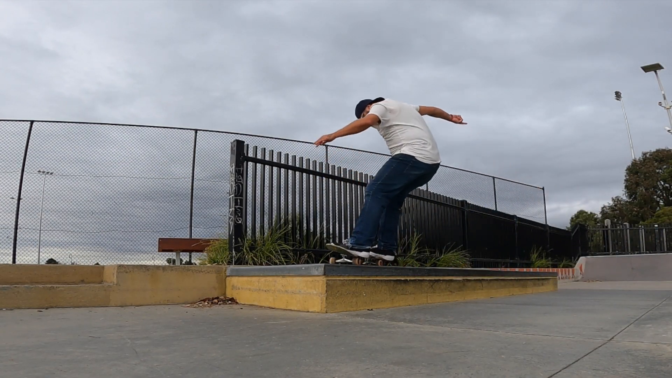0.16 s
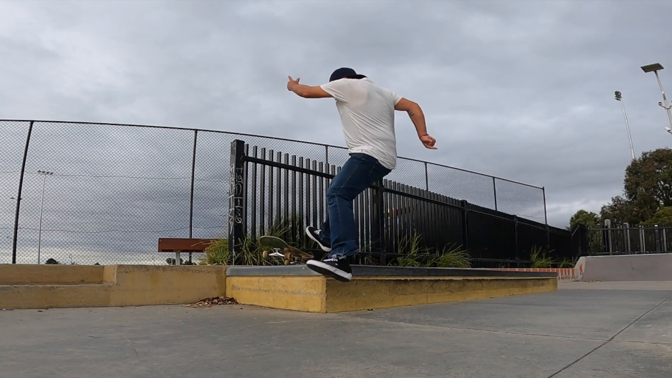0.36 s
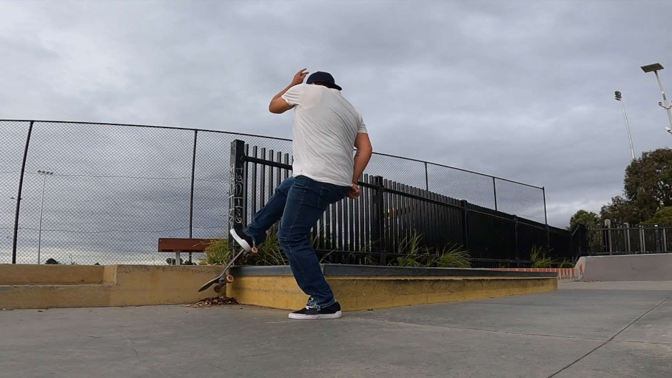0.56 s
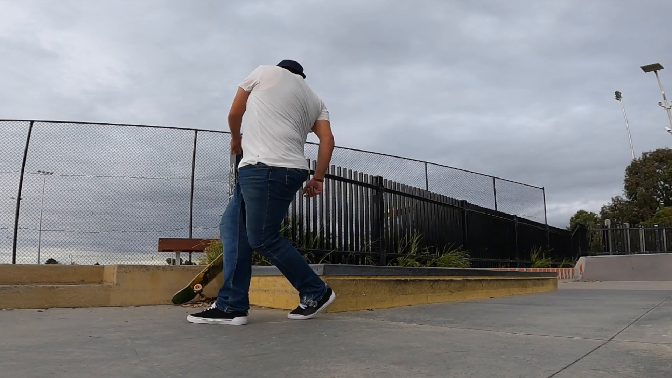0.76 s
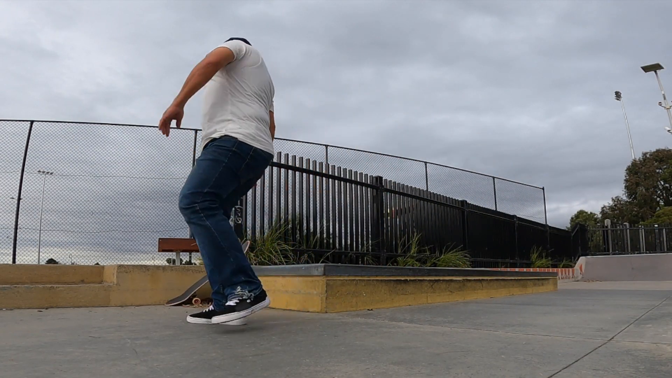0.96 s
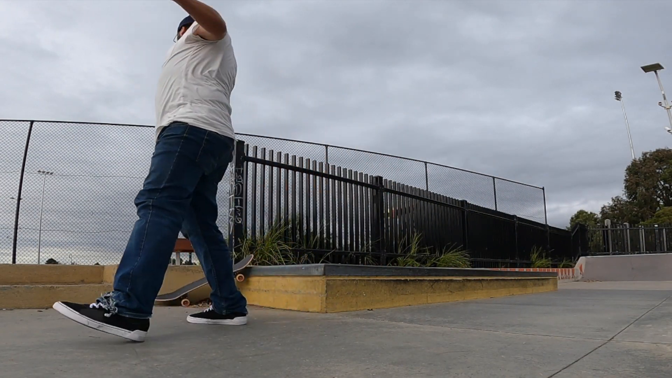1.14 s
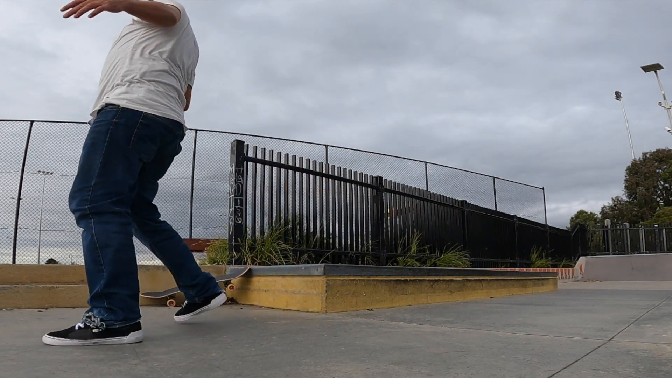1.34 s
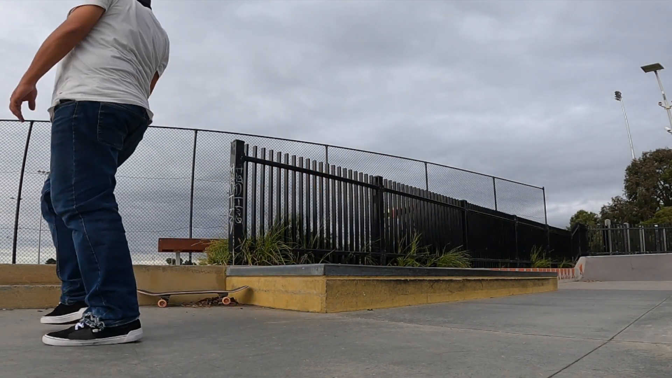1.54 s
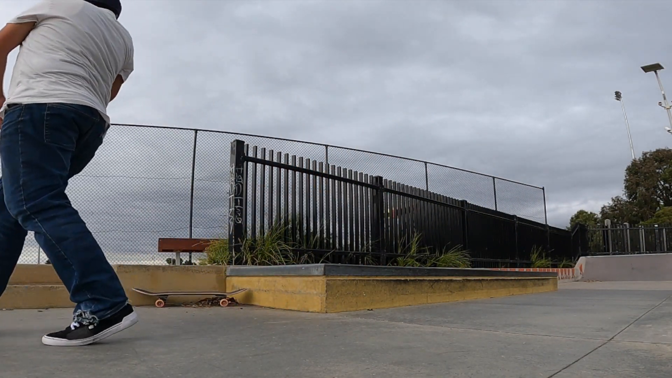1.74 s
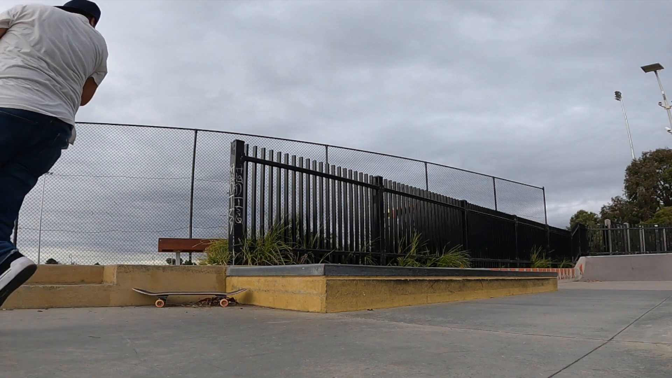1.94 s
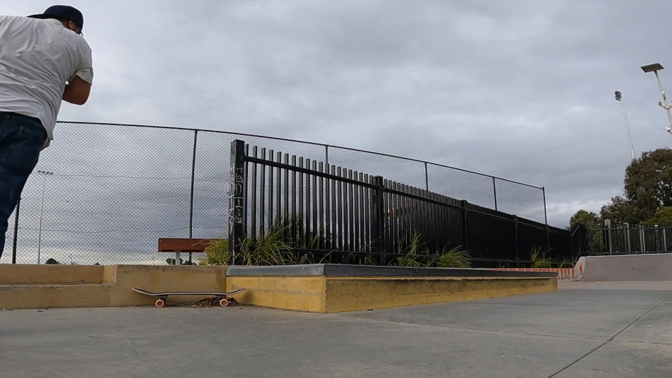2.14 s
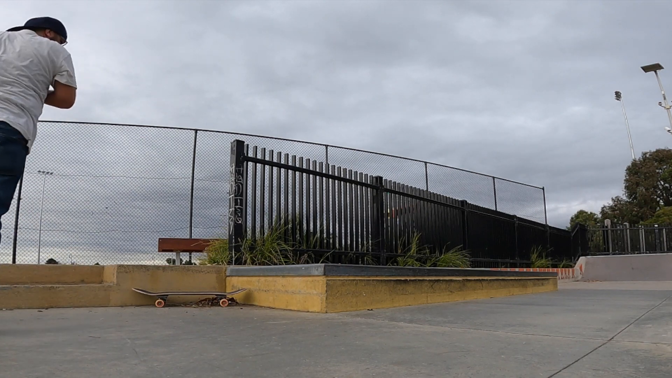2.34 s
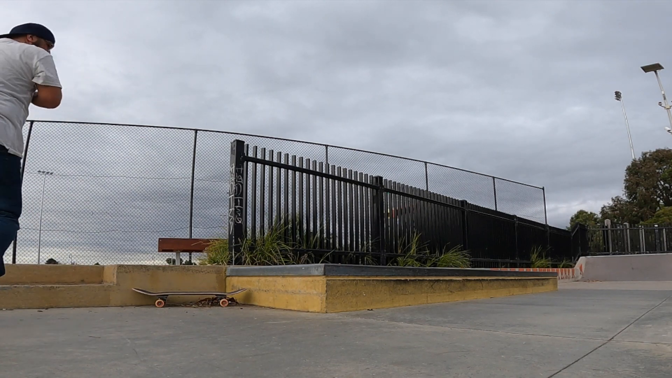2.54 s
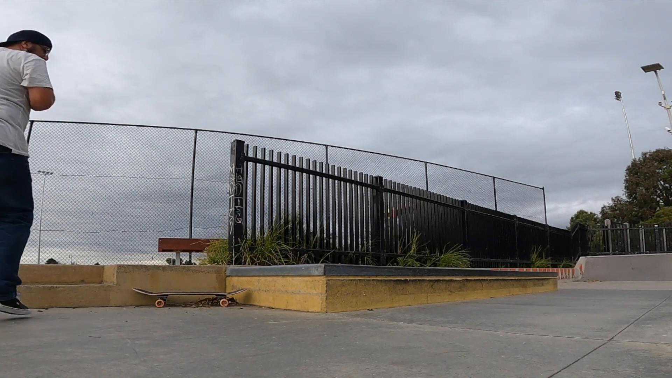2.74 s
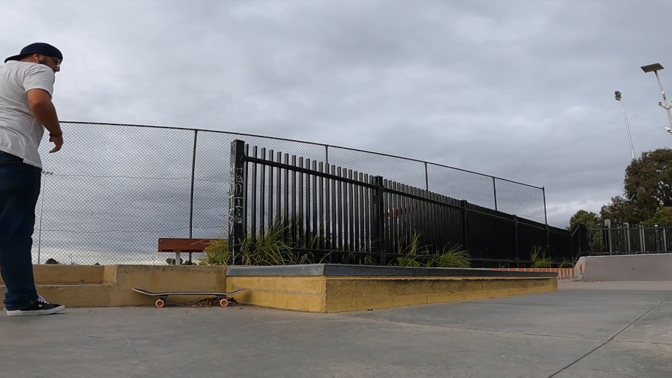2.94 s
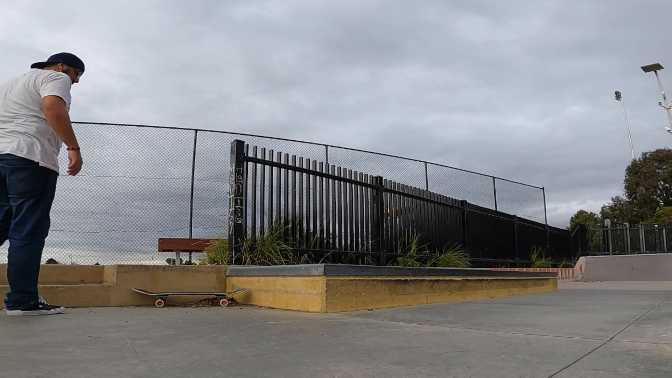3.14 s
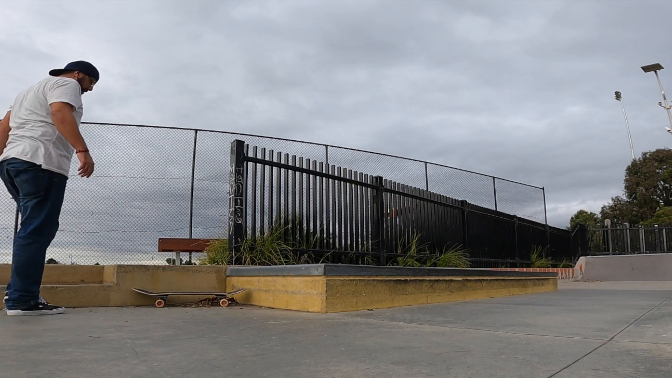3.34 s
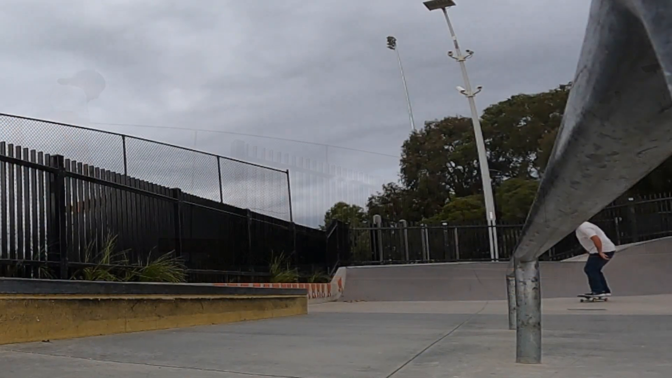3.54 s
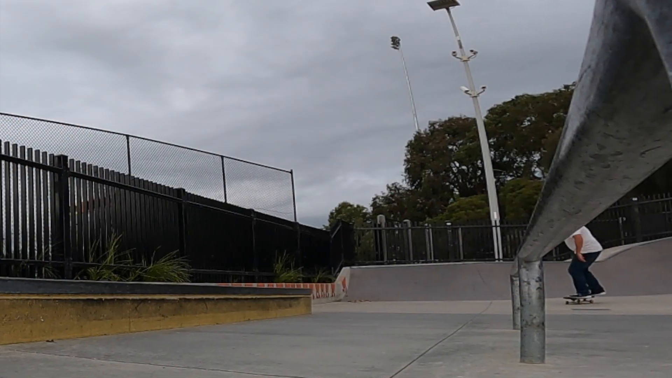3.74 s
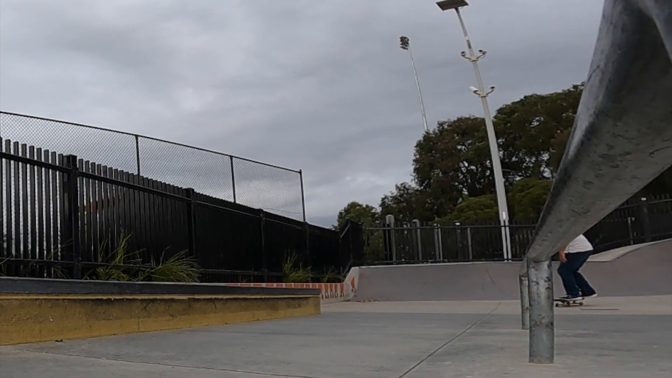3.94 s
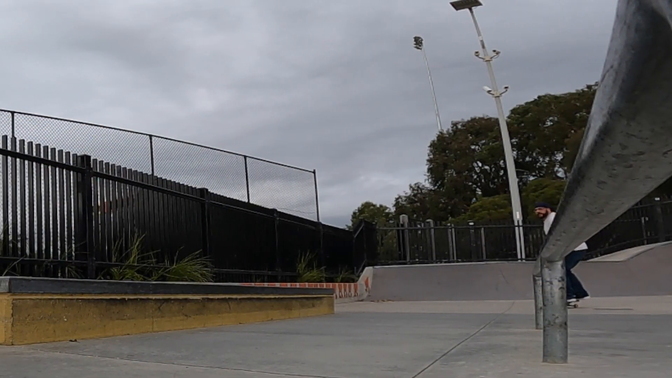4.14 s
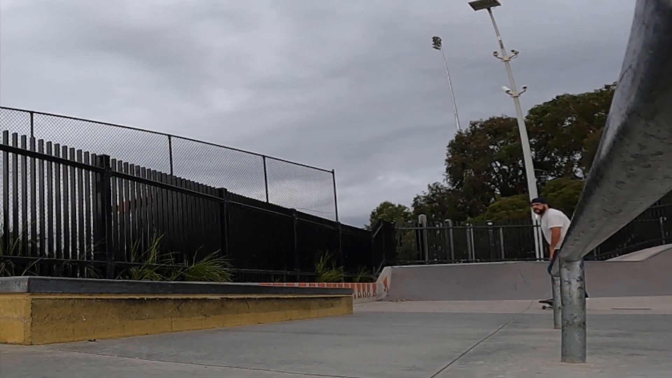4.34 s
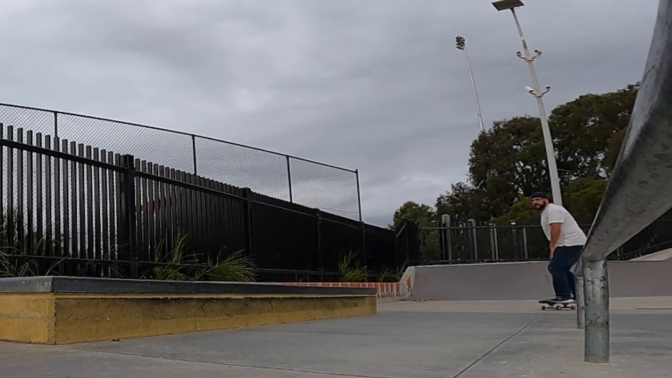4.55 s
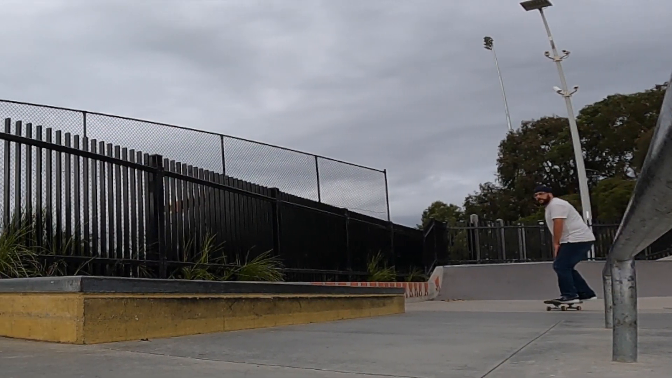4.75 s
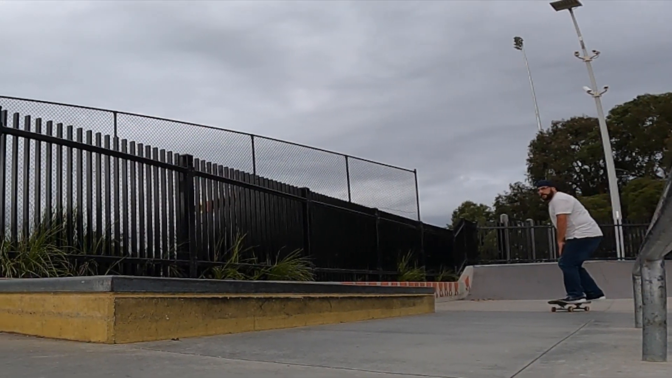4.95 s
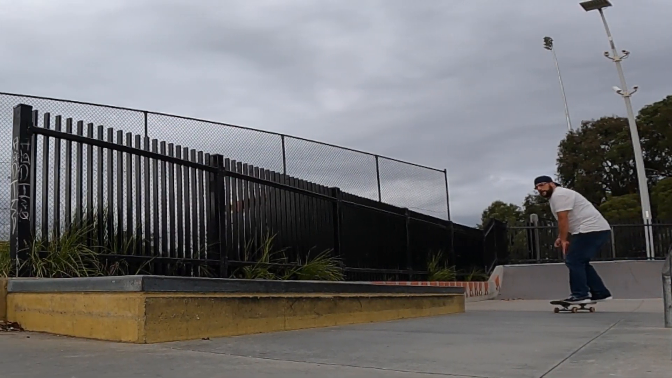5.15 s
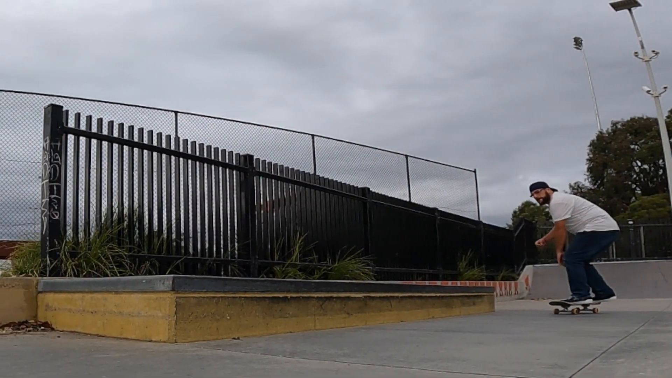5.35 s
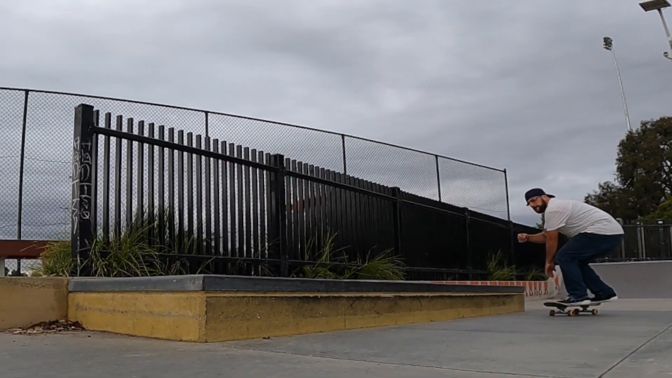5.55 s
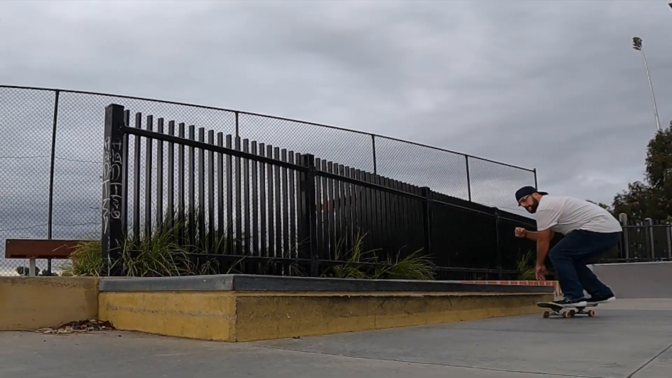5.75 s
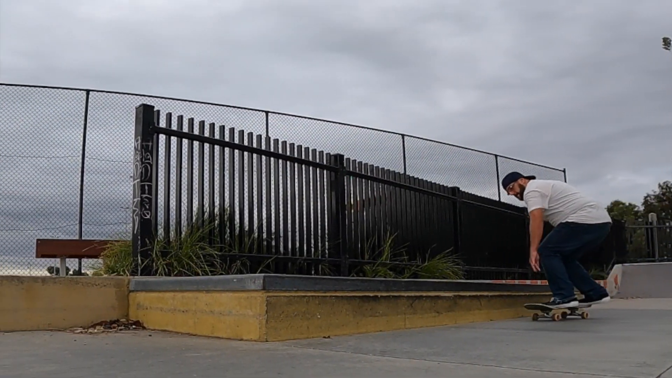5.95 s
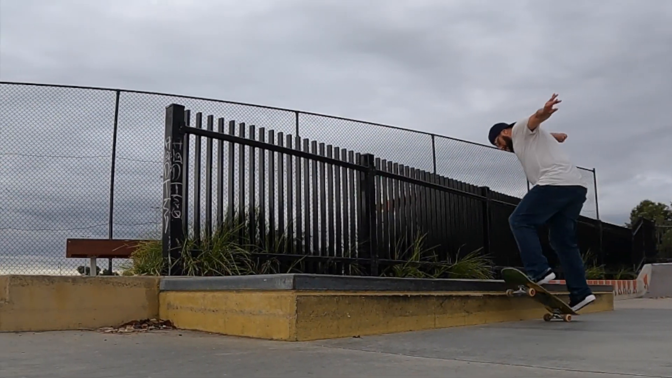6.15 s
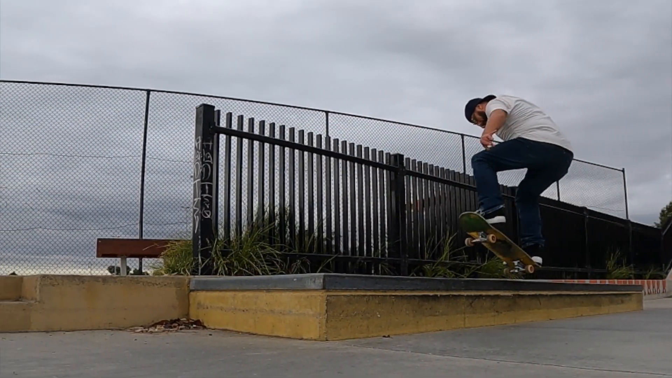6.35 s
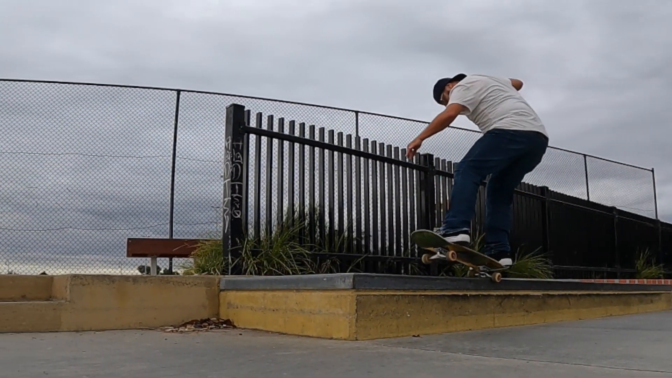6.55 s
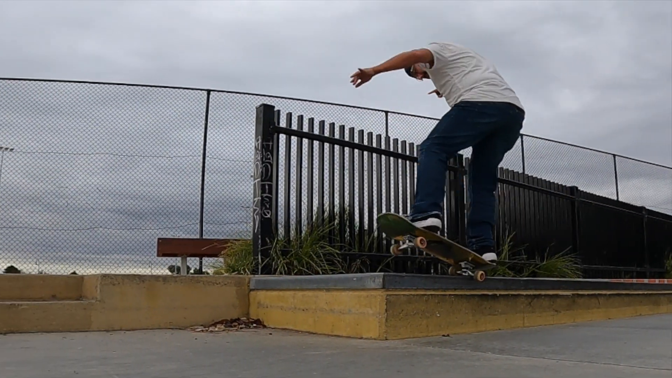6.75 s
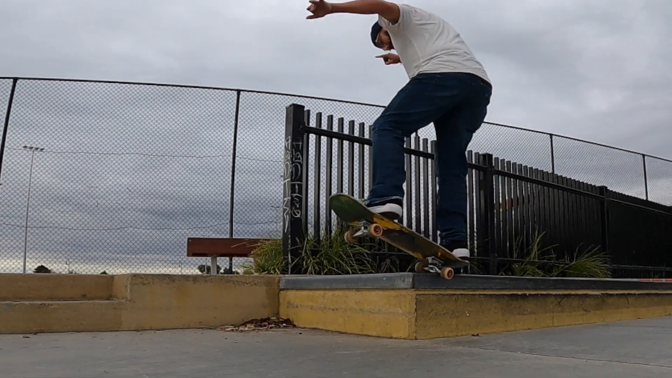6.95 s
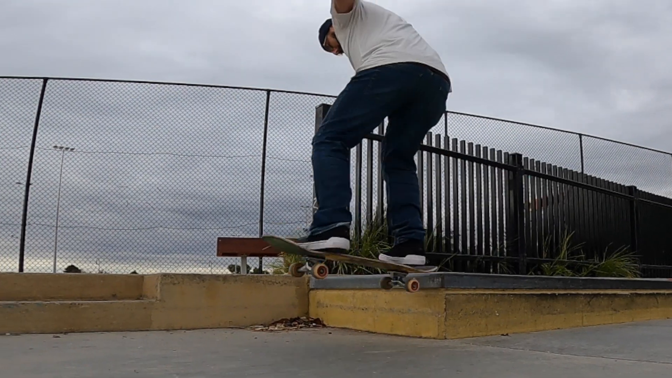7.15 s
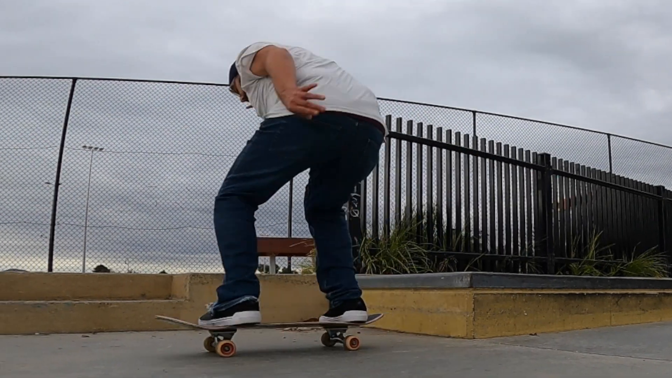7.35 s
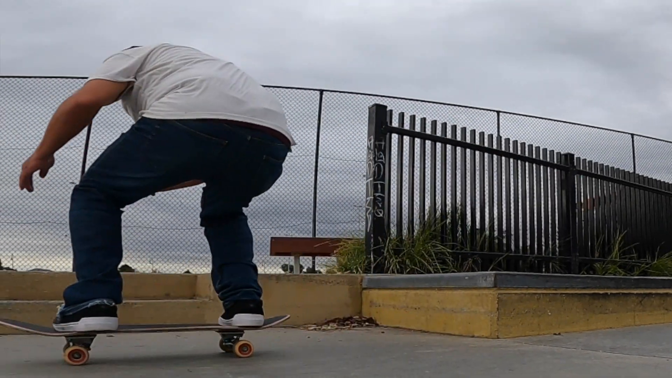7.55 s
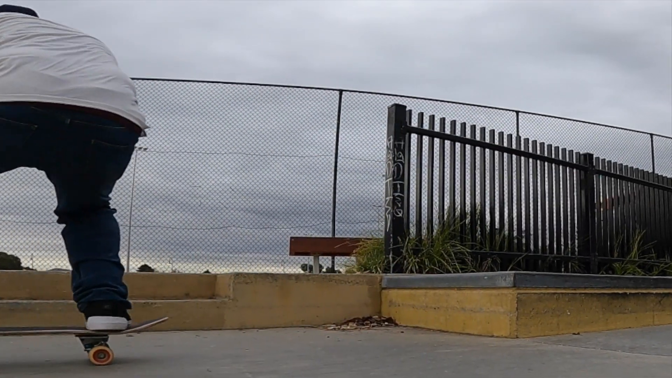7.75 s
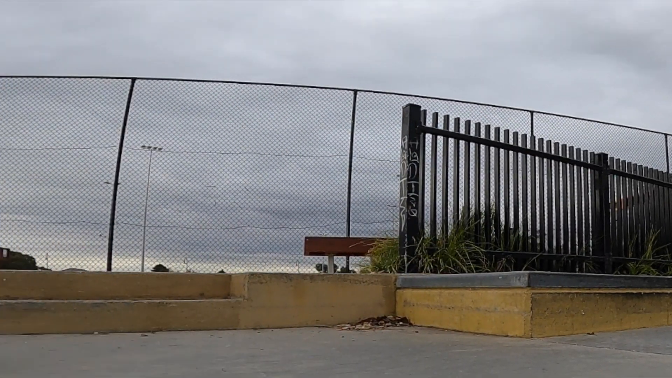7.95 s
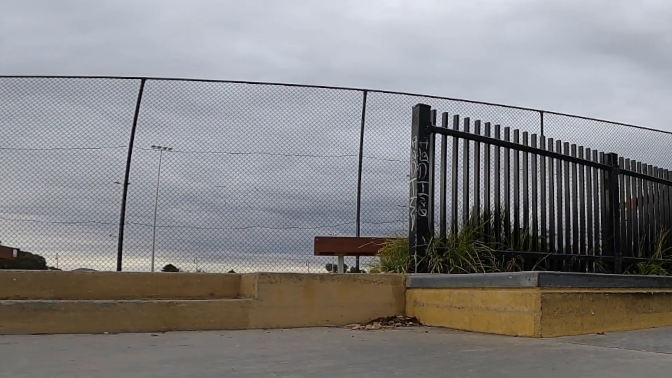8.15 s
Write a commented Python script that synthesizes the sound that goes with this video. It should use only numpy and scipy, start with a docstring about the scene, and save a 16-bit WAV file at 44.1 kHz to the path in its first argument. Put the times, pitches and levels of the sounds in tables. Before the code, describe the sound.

Open-air skate park, close microphone, low road rumble and soft tyre roar behind. At 0.05 s a board knacks hard onto a ledge, slides with faint grit, and knocks again near 0.5. From 0.55 to 1.75 it tumbles on concrete: dense, uneven wooden clacks, rattling trucks and scraping, with strong hits around 0.7, 0.8 and 1.58, and a faint low hum around 1.6. It settles into traffic, with tiny shoe scuffs and a squeak near 2.5 and scuffs near 3.0. Silence from 3.3 to 3.4, then a quick fade into almost mono sound. Soft gritty rolling and small ticks approach while a car engine drones upward. A sharp pop with a sole chirp comes at 6.27, crisp ledge clacks at 6.48, then a light, ticking grind until 7.3. The landing smacks at 7.33; wheels roll away with a low deck hum as the engine pitch drops to 8.3.

```python
"""A skate park near a road, in two scenes with a moment of silence between. First a board lands on a ledge, slides,
gets away and tumbles clattering on the concrete; then a rider rolls in, pops, grinds the ledge and lands while a car
pulls away on the road. Blows ring deck modes and truck steel, dragging is filtered grit clicks, shoes and car are
summed partials, and traffic is shaped noise that rumbles beneath both scenes. The loudest peaks are rounded."""
import sys
import numpy as np
from scipy import signal
from scipy.fft import rfft, irfft
from scipy.io import wavfile
from scipy.ndimage import uniform_filter1d, map_coordinates

SR = 44100
rng = np.random.default_rng(int(sys.argv[2]) if len(sys.argv) > 2 else 0)


def digitize_waveform(pressure):
    """Quantize a signal to 16-bit integers and store it at the path in sys.argv[1].

    Rows of a 2-D input are taken as channels; values are limited to [-1, 1].
    """
    field = np.atleast_2d(pressure).T
    bounded = np.clip(field, -1, 1)
    quanta = np.round(bounded * 32767).astype(np.int16)
    wavfile.write(sys.argv[1], SR, quanta)


N = 366030
CUT_S, BACK_S, FULL_S = 3.312, 3.41, 3.56  # the first scene stops, the second fades in, and is full
LEFT_RIGHT = np.array([[1], [-1]])  # signs that put a difference signal on the two sides

# Blows on the board and taps of the shoes. Each row: start in seconds, knock peak in dB, thud in dB re knock,
# crack in dB re knock, thud pitch in Hz, knock pitch in Hz, crack centre in Hz, rattle decay (t60) in seconds,
# build-up in seconds, share of the free ring time left by foot or ground. The last three are limited in use.
BOARD_BLOWS = [(0.055, -7, -2.5, -12, 300, 890, 3440, 0.063, 0.00078, 1.06),
               (0.059, -15.5, 5, -9.5, 318, 890, 3170, 0.033, 0.0022, 0.66),
               (0.068, -19, 5.5, -17, 203, 980, 2930, 0.027, 0.002, 0.73),
               (0.215, -15, -7.5, -7.5, 205, 660, 3480, 0.09, 0.0026, 0.63),
               (0.254, -24, -13, -8, 244, 1200, 3920, 0.063, 0.00082, 0.94),
               (0.474, -12.5, -7, -6.5, 326, 1010, 4230, 0.06, 0.0004, 1.02),
               (0.48, -18.5, -6.5, -3, 332, 1150, 3920, 0.037, 0.0044, 0.65),
               (0.53, -20.5, -11.5, 1, 140, 604, 2840, 0.06, 0.00074, 0.74),
               (0.539, -17, 3.5, 13.5, 194, 514, 4110, 0.015, 0.0036, 0.75),
               (0.548, -17.5, 9, 5.5, 160, 505, 3820, 0.019, 0.0023, 0.27),
               (0.558, -36, -7.5, 7, 140, 900, 3940, 0.021, 0.0045, 0.6),
               (0.578, -41, -13, 10, 140, 900, 3810, 0.015, 0.0007, 1),
               (0.616, -21.5, -17.5, -5, 148, 1230, 3020, 0.17, 0.0025, 0.83),
               (0.631, -14.5, -33, -5.5, 207, 740, 2870, 0.085, 0.00048, 1.2),
               (0.697, -6.5, -6.5, -4.0, 287, 1670, 2920, 0.065, 0.0005, 0.7),
               (0.726, -19.5, 3, -8, 293, 1100, 3750, 0.18, 0.00039, 1),
               (0.766, -11.5, -36.5, -9.5, 458, 744, 3020, 0.082, 0.00093, 0.73),
               (0.802, -23.5, 0, 4.5, 498, 630, 2830, 0.016, 0.00063, 0.66),
               (0.811, -16, -5.5, -2, 138, 1900, 2590, 0.015, 0.00046, 0.26),
               (0.818, -9, -10.5, -7.5, 277, 1180, 3500, 0.085, 0.0018, 1.0),
               (0.913, -23.5, -20, -5.5, 145, 1070, 4120, 0.036, 0.00049, 0.8),
               (0.959, -14, -21, -5, 307, 526, 3140, 0.21, 0.0013, 0.78),
               (0.973, -11, 2, -6, 273, 1340, 2680, 0.04, 0.0039, 0.95),
               (1.007, -20, -3.5, -6, 148, 1420, 2810, 0.11, 0.00096, 0.69),
               (1.05, -31, 9, -6.0, 278, 600, 3570, 0.043, 0.00084, 0.88),
               (1.061, -23.5, 1.5, -1, 280, 487, 2760, 0.13, 0.0045, 0.85),
               (1.1, -24, -16, -5, 137, 785, 3580, 0.044, 0.00058, 0.86),
               (1.212, -23, -5, -6, 141, 1270, 3180, 0.12, 0.00048, 0.58),
               (1.266, -13.5, -35, 4, 493, 990, 2750, 0.035, 0.0015, 1.4),
               (1.267, -13.5, -22.5, -7.5, 490, 550, 2870, 0.072, 0.0016, 0.59),
               (1.288, -23, -25, 1, 291, 860, 2850, 0.093, 0.0007, 1.2),
               (1.352, -20, -6.5, -2, 187, 1280, 3640, 0.041, 0.0014, 1.1),
               (1.36, -14.5, -3.5, 5, 215, 1400, 3400, 0.072, 0.0015, 0.68),
               (1.403, -20.5, -7.5, -4, 183, 1000, 5000, 0.07, 0.0011, 0.73),
               (1.416, -20.5, -1.5, 0, 277, 985, 4000, 0.13, 0.00057, 1),
               (1.436, -25, -21, 3, 140, 1100, 4360, 0.047, 0.00067, 0.82),
               (1.455, -30, -17, 0, 140, 1000, 3500, 0.04, 0.001, 0.9),
               (1.481, -17, -22, -4, 256, 1050, 4790, 0.032, 0.0007, 0.97),
               (1.495, -13, -6.5, -2.5, 206, 1000, 3480, 0.16, 0.0017, 1.2),
               (1.508, -15, -7, 0.5, 274, 1150, 3550, 0.096, 0.0026, 1),
               (1.544, -18, -6, -5, 143, 1110, 4100, 0.073, 0.0038, 0.82),
               (1.578, -7, -2, -0.5, 200, 710, 3230, 0.087, 0.00089, 0.46),
               (1.618, -28, -1, 3.5, 151, 940, 3750, 0.083, 0.0008, 1),
               (1.703, -13, -7.5, -1.5, 263, 1070, 3620, 0.12, 0.0037, 0.94),
               (1.756, -28, -2, -9, 137, 1110, 3760, 0.069, 0.006, 1.0),
               (2.339, -38, 3, -7, 227, 972, 2810, 0.16, 0.00056, 1),
               (5.052, -25.5, 1, -13, 128, 685, 2600, 0.19, 0.00051, 1.5),
               (5.424, -23, -1, -17, 137.3, 735, 3280, 0.081, 0.00049, 0.97),
               (5.754, -14, -6.5, -20.5, 496, 800, 2200, 0.081, 0.0008, 0.33),
               (5.843, -13.5, 0, -40, 235, 597, 2990, 0.02, 0.00099, 0.3),
               (5.902, -12.5, -8.5, -40.0, 141, 670, 2560, 0.018, 0.00055, 0.38),
               (6.098, -25, -1, -23, 138.7, 592, 2890, 0.079, 0.00091, 0.66),
               (6.174, -23, -6, -36, 140, 501, 2860, 0.042, 0.00058, 0.53),
               (6.273, -5.0, -13, 7, 307, 1370, 3140, 0.012, 0.00021, 0.7),
               (6.282, -21, -12, 2, 301, 1370, 3810, 0.012, 0.00057, 1.2),
               (6.4, -20.5, -15, -13, 140, 493, 2425, 0.038, 0.00092, 1.1),
               (6.442, -26.5, 4, -15, 142, 1130, 2780, 0.18, 0.0007, 0.54),
               (6.479, -4, -11, -15, 302, 880, 4200, 0.016, 0.00073, 0.56),
               (6.482, -32, 13, -10, 255, 1000, 4200, 0.024, 0.00091, 1.1),
               (6.487, -7.5, -1.5, -8, 256, 1100, 4300, 0.031, 0.00045, 0.51),
               (6.497, -24, 10, 1, 255, 1100, 4500, 0.024, 0.0011, 1.1),
               (6.502, -9, -5, -9.5, 245, 1030, 4500, 0.017, 0.00053, 0.5),
               (6.512, -25, 7.5, 1, 250, 1200, 4000, 0.021, 0.0012, 0.71),
               (6.773, -19.5, -3.5, -15, 182, 960, 3600, 0.03, 0.0011, 0.72),
               (6.811, -26, -6, -26, 144, 898, 3573, 0.021, 0.00084, 0.92),
               (6.834, -24.5, 0, -25, 145, 950, 3470, 0.049, 0.00084, 1.5),
               (6.853, -27.5, 4, -12, 146, 910, 3420, 0.049, 0.001, 0.75),
               (6.908, -29.5, -5, -10.0, 140, 704, 3800, 0.046, 0.00052, 0.92),
               (6.986, -26, -3, -15, 183, 858, 3400, 0.15, 0.005, 1.2),
               (7.069, -25.5, 2.5, -18, 142, 855, 3650, 0.078, 0.00077, 0.78),
               (7.282, -27, 8, -10, 139, 1026, 2548, 0.085, 0.0044, 0.98),
               (7.321, -22, 1, -2.0, 140, 1507, 3760, 0.092, 0.0055, 1.0),
               (7.333, -4.5, -1.0, -7.5, 260, 640, 3122, 0.032, 0.0011, 0.56),
               (7.339, -8, -7, -5.5, 390, 1260, 2860, 0.06, 0.0018, 0.69),
               (7.345, -16, -6, -11, 274, 595, 2840, 0.022, 0.00086, 0.68),
               (7.348, -10.5, 1, -11, 193, 1300, 2400, 0.066, 0.0017, 0.48),
               (7.356, -23, 8, -10, 149, 1500, 2400, 0.041, 0.0016, 0.28),
               (7.787, -41, 0, -2, 140, 606, 2900, 0.069, 0.0007, 1),
               (8.135, -22.5, -12, -45, 431, 530, 3350, 0.029, 0.00059, 1.5)]


def undb(db):
    """Decibels to an amplitude factor."""
    return 10 ** (np.asarray(db) / 20)


def rms1(x):
    """Scale a signal to an RMS of one."""
    return x / np.sqrt(np.mean(x ** 2))


def curves(rows, off_db=None):
    """Draw columns against time; several spans are joined, dropping to off_db between them if it is given."""
    if off_db is not None:
        rows = [[(r[0][0] - .02, off_db, *r[0][2:]), *r, (r[-1][0] + .02, off_db, *r[-1][2:])] for r in rows]
    seconds, *columns = np.vstack(rows).T
    return [np.interp(np.arange(N) / SR, seconds, c) for c in columns]


def band(x, lo_hz, hi_hz):
    """Keep the band between two frequencies."""
    return signal.sosfilt(signal.butter(2, [lo_hz, hi_hz], "bandpass", fs=SR, output="sos"), x)


def walk(rate):
    """Random levels held 1 / rate s and smoothed twice; spread near 1."""
    hold = int(SR / rate)
    steps = np.repeat(rng.standard_normal(N // hold + 1), hold)
    return 1.39 * uniform_filter1d(uniform_filter1d(steps, hold), hold)[:N]


def clicks(n, per_s, scatter_db):
    """Sparse clicks of either sign, their random sizes further spread by scatter_db."""
    on = rng.random(n) < per_s / SR
    sign = rng.standard_normal(n)
    size = np.minimum(rng.exponential(size=n), 4)
    return on * sign * undb(scatter_db * size)


def sides(x, pan_db):
    """Place a sound by its level difference, left minus right."""
    return x * undb(pan_db / 2 * LEFT_RIGHT)


def blows():
    """Each blow is a push with a rattle around it; it rings deck modes near its pitches and cracks in the treble."""
    # What the deck rings with. Each row: mode in Hz, level in dB, free decay (t60) in seconds.
    deck_modes = [(141, -10, 0.12), (218.8, -1, 0.043), (265, 5, 0.036), (329, 2, 0.04), (394, 0.5, 0.038),
                  (544, 2.5, 0.03), (630, 1.5, 0.039), (721, 6, 0.023), (831, 4.5, 0.018),
                  (940, 9.5, 0.017), (1070, 2, 0.035), (1162, 6.5, 0.021), (1370, 8, 0.026),
                  (1642, 12, 0.012), (1978, 2.5, 0.038), (2266, -4, 0.06)]
    # Axles and hangers. Each row: mode in Hz, level in dB, free decay (t60) in seconds.
    truck_modes = [(2750, 1, 0.0088), (3460, -1, 0.0077), (4160, -6.5, 0.0082), (4830, -1, 0.019),
                   (5690, -3.5, .012), (6500, -2.5, .01)]
    hz, db, t60 = np.array(deck_modes).T[:, :, None]
    steel_hz, steel_db, steel_t60 = np.array(truck_modes).T[:, :, None]
    clean_s = 0.041  # blows with a shorter rattle are cleaner hits: less rattle, fewer modes
    strike_octaves = 0.53  # nominal distance from the favoured pitch at which a blow still wakes modes
    rattle_per_s, rattle_db, rattle_scatter_db = 5000, -10, 1
    snap_db, snap_t60_s = 5, 0.0099  # a short loud snap where the rattle peaks
    contact_s = 0.0002  # nominal press of wood and urethane on the concrete
    soft_per_crack = 0.33  # a blow with less crack is softer: dB of longer contact for each dB
    spill_db, spill_per_crack = -7, 0.76  # far modes answer this much; fewer dB for each dB the crack is weaker
    body_rattle_db, crack_apart = -7, 0.25  # deck and trucks feel less of the rattle than the crack does
    truck_db, truck_scatter_db = -4.5, 2.5  # steel re crack before the clean-hit cut; woken unevenly
    air_hz = (8500, 15500)

    out, t = np.zeros((2, N + SR)), np.arange(SR // 5) / SR
    for s, knock_db, thud_db, crack_db, thud_hz, knock_hz, crack_hz, rattle_s, rise_s, ring in BOARD_BLOWS:
        first = s <= CUT_S
        # The blows begin to the right and drift left through the first scene.
        pan_db = -2.2 + 1 * min(s, CUT_S) + 1.9 * rng.standard_normal()
        loose = min(rattle_s / clean_s, 1)
        rise_s, ring = np.clip(rise_s, 2 / SR, .02), np.clip(ring, .2, 1.5)
        weak_crack_db = min(crack_db, 0)

        # The push, and a rattle that builds up to it and dies away.
        after = np.maximum(t - rise_s, 0)
        decay = undb(-60 * after / np.clip(rattle_s, .008, .15))
        snap = undb(snap_db - 60 * abs(t - rise_s) / snap_t60_s)
        fade = loose ** 2 * undb(rattle_db) * np.minimum(t / rise_s, 1) * (decay + snap)
        rattle, odd = (rms1(clicks(len(t), rattle_per_s, rattle_scatter_db)) * fade for _ in range(2))
        push = np.arange(len(t)) == int(rise_s * SR)
        body_force = push + undb(body_rattle_db) * rattle

        # The hold on the board shifts its modes a little; neighbours swing in opposite senses.
        detune = 1 + 0.035 * rng.standard_normal(hz.shape)
        modes = undb(db - 60 * t / (ring * t60)) * np.sin(2 * np.pi * hz * detune * t)
        modes = modes * (-1) ** np.arange(len(hz))[:, None]
        contact = np.hanning(int(contact_s * undb(-soft_per_crack * weak_crack_db) * SR) + 3)
        felt = np.convolve(body_force, contact)[:len(t)]
        reach = min(loose / ring, 1.5) * strike_octaves

        def ring_deck(pitch_hz, spill):
            """Ring the deck, favouring modes near one pitch."""
            share = spill + np.exp(-(np.log2(hz / pitch_hz) / reach) ** 2)
            return signal.fftconvolve(felt, (modes * share).sum(axis=0))[:len(t)]

        knock = ring_deck(knock_hz, undb(spill_db + spill_per_crack * weak_crack_db) * (hz > 500))
        thud = ring_deck(thud_hz, 0)

        # Crack and air are the push and rattle themselves, each in a treble band.
        spread = sides(push + rattle, pan_db) + crack_apart * odd * LEFT_RIGHT
        # nominal octaves below and above the centre, narrower for clean hits
        octaves = np.array((1, 0.79) if first else (0.96, 0.4))
        crack = band(spread, *crack_hz * 2 ** (np.sqrt(loose) * octaves * [-1, 1]))
        air = -band(spread, *air_hz)
        air_db = crack_db + (-34.5 if first else -34)

        # Truck steel near the crack's pitch rings along with it.
        woken = undb(truck_scatter_db * rng.standard_normal(steel_hz.shape))
        woken = woken * np.exp(-(np.log2(steel_hz / crack_hz) / 0.45) ** 2)
        steel_decay = undb(steel_db - 60 * t / (ring * steel_t60))
        steel = (woken * steel_decay * np.sin(2 * np.pi * steel_hz * t)).sum(axis=0)
        steel = signal.fftconvolve(sides(body_force, pan_db), steel[None], axes=1)[:, :len(t)]
        crack = crack / abs(crack).max() + loose * undb(truck_db) * steel / abs(steel).max()

        parts = ((sides(knock, pan_db), 0), (thud, thud_db), (crack, crack_db), (air, air_db))
        i = int(s * SR)
        out[:, i:i + len(t)] += sum(p / abs(p).max() * undb(knock_db + d) for p, d in parts)
    return out[:, :N]


def pressure():
    """How hard things drag, and with what colour: the long contacts, a skid after each blow, the scuffs."""
    # Dragging over concrete and steel, in five spans: slide, tumble, roll in, grind, roll away.
    # Each row: time in seconds, level in dB.
    drags = [
        [(0.0, -66), (0.2, -53.5), (0.33, -55), (0.45, -67)],
        [(0.475, -44), (0.58, -52), (0.65, -48), (0.89, -51), (1.08, -55.5), (1.16, -61), (1.26, -54.5),
         (1.39, -48), (1.43, -45), (1.47, -51), (1.52, -45), (1.63, -46), (1.77, -52), (1.88, -72)],
        [(3.55, -92), (3.9, -73), (4.3, -69.5), (5.1, -65.5), (5.98, -64), (6.1, -56.5), (6.24, -60.5),
         (6.36, -64)],
        [(6.42, -56), (6.55, -59.5), (6.73, -65), (6.78, -61), (6.9, -59), (6.95, -61), (7.01, -59.5),
         (7.11, -61), (7.3, -62.5)],
        [(7.36, -63), (7.53, -67.5), (7.7, -70), (8.3, -65)],
    ]
    # Colour of those five, then of the scuffs between tumble and silence. Each row: top in dB re level,
    # brightest pitch in Hz, its lift in dB, deck in dB re level, flutter in dB.
    drag_colours = [(-7, 5900, 7, 7, 2.5), (-11.5, 3000, -0.5, 6.5, 2.5), (-12, 3970, 16.5, 0, 1.5),
                    (-14.5, 4000, 14.5, 6, 0), (-10, 3995, 12.5, 8.5, -0.5), (-10, 5400, 3, 6, 4)]
    # Soles, the dragging tail, wheels touching down. Each row: centre in seconds, level in dB, length in seconds.
    scuffs = [(2.509, -54, 0.015), (2.533, -44, 0.022), (2.603, -66, 0.039), (2.985, -53, 0.0097),
              (2.995, -51, 0.016), (3.024, -60, 0.012), (3.088, -64, 0.069), (6.27, -37, 0.018),
              (7.332, -31, 0.016)]
    skid_db, skid_length = -27, 1.22  # level re the blow's crack, decay re its rattle
    catch_per_s, catch_db, catch_t60_s = 80, -1, 0.015

    t = np.arange(N) / SR
    spans = [[(s, db, *c) for s, db in rows] for rows, c in zip(drags, drag_colours)]
    level_db, *colour = curves([sum(spans[:2], []), sum(spans[2:], [])], off_db=-77)
    gain = undb(level_db)

    # Board and truck catch at random through the tumble and most of the grind.
    catching = sum((t > r[0][0]) & (t < r[-1][0]) for r in (drags[1], drags[3][2:]))
    catches = abs(clicks(N, catch_per_s, 1.8)) * catching
    gain *= 1 + undb(catch_db) * signal.lfilter([1], [1, -undb(-60 / catch_t60_s / SR)], catches)

    after = t[:SR // 3]
    for s, knock_db, _, crack_db, _, _, _, rattle_s, rise_s, _ in BOARD_BLOWS:
        i = int((s + rise_s) * SR)
        skid = undb(knock_db + crack_db + skid_db - 60 * after / (skid_length * rattle_s))
        gain[i:i + len(after)] += skid[:N - i]
    gain += sum(undb(db) * np.exp(-abs(2 * (t - s) / length)) for s, db, length in scuffs)
    shoes = (t > drags[1][-1][0]) & (t < CUT_S)
    return gain, *(np.where(shoes, b, a) for a, b in zip(colour, drag_colours[-1]))


def scrape():
    """Dense grit clicks pass through the resonances of trucks and deck, under an uneven pressure."""
    # Scraping resonances. Each row: centre in Hz, width in Hz, level in dB.
    grit_bands = [(2500, 4200, 0), (3140, 1600, 8.5), (4750, 1700, -0.5), (5680, 1400, 4),
                  (7400, 1500, 2.5), (8400, 1600, -3)]
    grit_per_s, grit_scatter_db = 9000, -0.4
    grit_apart = 0.29  # difference signal between the sides, re the common one
    top_hz, deck_hz = (9200, 14000), (745, 1420)  # bright grit; where the deck takes up the scraping

    gain, top_db, bright_hz, lift_db, deck_db, flutter_db = pressure()
    mid, side = (clicks(N, grit_per_s, grit_scatter_db) for _ in range(2))
    grit = mid + grit_apart * side * LEFT_RIGHT
    body = 0
    for k, (f, width, db) in enumerate(grit_bands):
        lift = lift_db * np.exp(-(np.log2(f / bright_hz) / 0.31) ** 2)
        # neighbouring resonances swing in opposite senses, so no hole opens between them
        body = body + (-1) ** k * undb(db + lift) * rms1(band(grit, f - width / 2, f + width / 2))
    body = body / np.sqrt(np.sum(undb(np.array(grit_bands)[:, 2]) ** 2))
    top = undb(top_db) * rms1(band(grit, *top_hz))
    deck = undb(deck_db) * rms1(band(grit, *deck_hz))
    return gain * undb(flutter_db * walk(60)) * (body + top - deck)


def roll_off():
    """Rolling wheels whirr and keep a low band of the deck sounding: two bands of noise."""
    # The deck hums as the board rolls away. Each row: time in seconds, RMS level in dB.
    deck_hum = [(7.45, -50.5), (8.01, -43), (8.1, -50), (8.14, -34), (8.18, -43.5), (8.3, -48)]
    roll_hz, wheel_hz, wheel_db = (430, 584), (1400, 1900), -59
    level_db, = curves([deck_hum], off_db=-92.5)
    whirr = undb(wheel_db) * rms1(band(rng.standard_normal(N), *wheel_hz))
    whirr = whirr * (np.arange(N) > deck_hum[0][0] * SR)
    return undb(level_db) * rms1(band(rng.standard_normal(N), *roll_hz)) + whirr


def squeak():
    """Rubber soles slip on concrete for a moment: two partials whose phase wanders."""
    # Shoe soles. Each row: centre in seconds, length in seconds, pitch in Hz, first partial in dB,
    # second partial in dB, phase wander in radians.
    sole_squeaks = [(1.225, .08, 2620, -54, -66, .33), (2.536, .011, 2830, -37, -38, .26),
                    (5.87, .02, 2650, -47, -70, .33), (6.264, .024, 4350, -33, -70, .9)]
    out = 0
    for s, length, hz, one_db, two_db, wander in sole_squeaks:
        t = np.arange(N) / SR - s
        phase = 2 * np.pi * hz * t + wander * walk(920)
        tone = undb(one_db) * np.sin(phase) + undb(two_db) * np.sin(2 * phase)
        out = out + np.exp(-(2 * t / length) ** 2) * tone
    return out


def car():
    """Partials of the firing rate in step, so that each cycle is one suction-like pulse."""
    # Car on the road. Each row: time in seconds, firing rate in Hz, level in dB, second partial in dB re level.
    engine = [(3.5, 39, -36, -18), (3.9, 43.3, -29, -22), (4.41, 47.08, -25, -11.5),
              (4.97, 50.62, -23.5, -8.5), (5.25, 51.7, -24.5, -12.5), (5.6, 54.1, -22, -9),
              (5.73, 54.66, -26, -4), (6.04, 56.77, -20.5, -11.5), (6.27, 57.65, -22.5, -11),
              (6.33, 58.8, -28.5, -3.5), (6.67, 61, -27, -5), (6.79, 63.58, -28.5, -6.5),
              (7.34, 62.2, -23, -5.5), (7.59, 57.3, -27.5, -15), (7.75, 53.2, -34, -1),
              (8.02, 45.9, -27.5, -22), (8.3, 39.3, -31.5, -20)]
    third_db, fall_db = -9.5, -9.5  # third partial re level; fall from partial to partial above it
    waver_db = 1  # quick unevenness
    hz, level_db, second_db = curves([engine])
    partials_db = [0, second_db] + [third_db + fall_db * k for k in range(4)]
    phase = 2 * np.pi * np.cumsum(hz) / SR
    tones = sum(undb(d + waver_db * walk(18)) * np.cos((k + 1) * phase) for k, d in enumerate(partials_db))
    return -np.sqrt(2) * undb(level_db) * tones * (np.arange(N) > CUT_S * SR)


def traffic():
    """Tyre roar over the rumble of distant engines, both shaped noise."""
    # Traffic in the two scenes. Each row: time in seconds, tyre roar in dB, rumble in dB re roar.
    traffic_levels = [
        [(0.0, -40, 9.5), (0.54, -44, 10.5), (0.68, -39, 9.5), (1.1, -42, 9), (1.43, -37.5, 5),
         (1.73, -41.5, 9), (2.61, -37, 10.5), (3.24, -37, 9.5)],
        [(3.62, -34, 6), (4.77, -35.5, 5), (5.4, -35, 3.5), (6.08, -35, 2.5), (6.42, -42, 9), (6.8, -37.5, 3),
         (7.55, -42.5, 9), (8.25, -44.5, 12.5)],
    ]
    # Tyre roar spectrum. Each row: frequency in Hz, relative density in dB per Hz.
    roar_shape = [(120, -36), (200, -7.5), (277, -4), (397, -7), (530, -8.5), (818, -12.5), (998, -10),
                  (1780, -22), (2600, -31), (2900, -32.5), (9380, -57), (15000, -94.5)]
    # Engine rumble spectrum. Each row: frequency in Hz, relative density in dB per Hz.
    rumble_shape = [(13, -21.5), (22, -10), (48, 1.5), (81, -1), (107, -3.5), (129, -2), (156, -6.5),
                    (226, -10.5), (280, -13.5), (320, -24), (420, -53.5), (700, -120)]
    roar_db, rumble_db = curves(traffic_levels)
    return undb(roar_db) * (hiss(roar_shape) + hiss(rumble_shape) * undb(rumble_db))


def hiss(shape):
    """Noise of a given spectrum in half octaves that flicker alone; the treble differs more between the sides."""
    # Width of the noise. Each row: frequency in Hz, side re mid as an amplitude ratio.
    width_shape = [(30, .03), (100, .03), (250, .06), (1000, 0.57), (8000, 0.71)]
    flicker_db, flicker_db_per_octave = 2.5, -0.22  # at the lowest band; higher bands are steadier
    hz, db = np.array(shape).T
    f = np.maximum(np.arange(N // 2 + 1) * SR / N, 1)
    colour = undb(np.interp(np.log(f), np.log(hz), db, left=-90, right=-120))
    width_hz, width = np.array(width_shape).T
    apart = np.interp(np.log(f), np.log(width_hz), width)
    mid, side = (rfft(rng.standard_normal(N)) * colour * g for g in (1, apart))
    lowest, out = np.log2(hz[0]), 0
    for centre in np.arange(lowest, np.log2(hz[-1]) + .5, .5):
        share = np.cos(np.pi * np.clip(np.log2(f) - centre, -.5, .5)) ** 2
        depth_db = max(flicker_db + flicker_db_per_octave * (centre - lowest), .5)
        out = out + irfft(mid * share, N) * undb(depth_db * walk(6))
    return (out + irfft(side, N) * LEFT_RIGHT) / out.std()


def hum():
    """A faint low tone early on: one sine that wavers in level and glides in pitch."""
    # The hum. Each row: time in seconds, pitch in Hz, RMS level in dB before the waver.
    low_hum = [(0, 152, -49), (.9, 145.5, -52.5), (1.6, 144, -35), (2, 140, -74.5)]
    hz, db = curves([low_hum])
    return undb(db + 2 * walk(17)) * np.sqrt(2) * np.sin(2 * np.pi * np.cumsum(hz) / SR)


def scene():
    """Sum the near sounds, their scattered echo, and the road behind them."""
    left_lag_s = 0.00001  # near sounds reach the left side later
    echo_db, echo_t60_s = (-30.5, -28), 0.25  # levels in the first and second scene
    near = blows() + scrape() + squeak() + roll_off()
    late_left = map_coordinates(near[0], [np.arange(N) - left_lag_s * SR], mode="nearest")
    near = np.array([late_left, near[1]])

    # walls, fence and banks scatter a short dull tail back, another to each side
    t = np.arange(SR // 3) / SR
    tail = band(rng.standard_normal((2, len(t))), 350, 5500) * undb(-60 * t / echo_t60_s) * (t > .004)
    echo = signal.fftconvolve(near, tail / np.sqrt((tail ** 2).sum() / 2), axes=1)[:, :N]
    echo_gain = undb(np.where(np.arange(N) < CUT_S * SR, *echo_db))
    return near + echo_gain * echo + car() + hum() + traffic()


def record(dry):
    """Dull the treble, round the peaks, fall silent and fade back in nearly mono, then cut the extreme top."""
    treble_hz, top_hz = 9000, 15800  # the microphone dulls above the first; the second is a steep limit
    ceiling, gain_db = 1.05, 1.1
    mono_db = -49.5  # side level left in the second scene
    t = np.arange(N) / SR
    mid = (dry[0] + dry[1]) / 2
    side = (dry[0] - dry[1]) / 2 * np.where(t < CUT_S, 1, undb(mono_db))
    heard = signal.sosfilt(signal.butter(2, treble_hz, fs=SR, output="sos"), [mid + side, mid - side])
    rounded = ceiling * np.tanh(undb(gain_db) * heard / ceiling)
    fade = np.where(t < CUT_S, 1, np.clip((t - BACK_S) / (FULL_S - BACK_S), 0, 1) ** 1.8)
    return signal.sosfilt(signal.ellip(8, .2, 70, top_hz, fs=SR, output="sos"), fade * rounded)


dry = scene()
out = record(dry)
digitize_waveform(out)
```